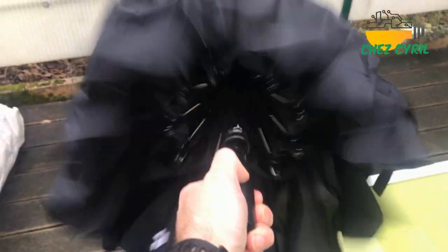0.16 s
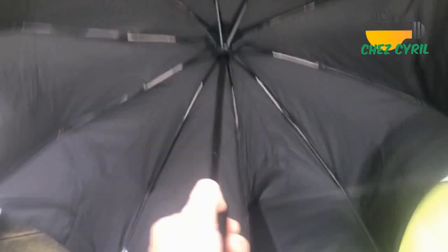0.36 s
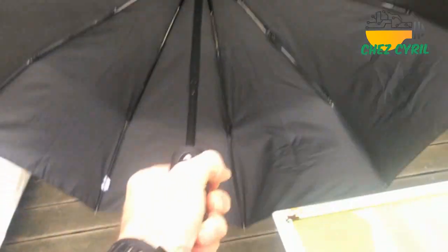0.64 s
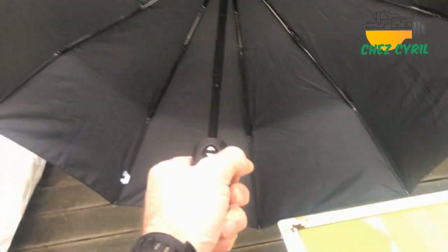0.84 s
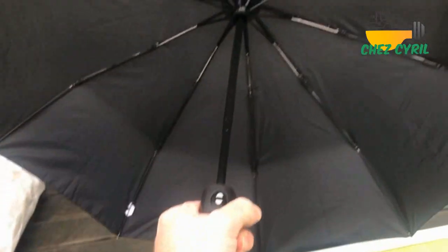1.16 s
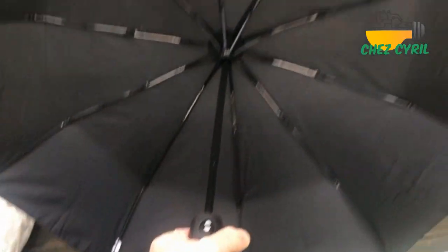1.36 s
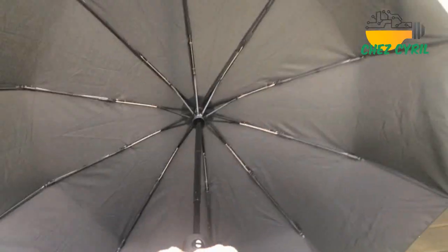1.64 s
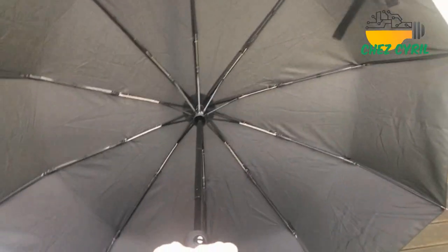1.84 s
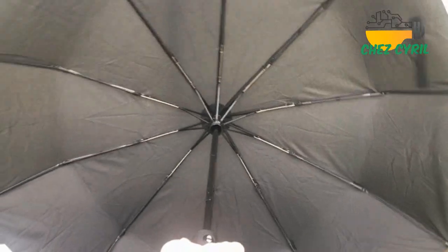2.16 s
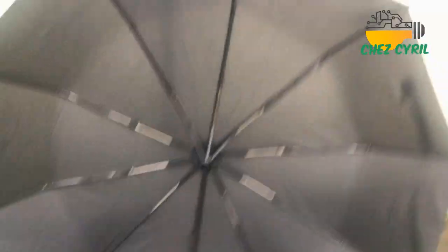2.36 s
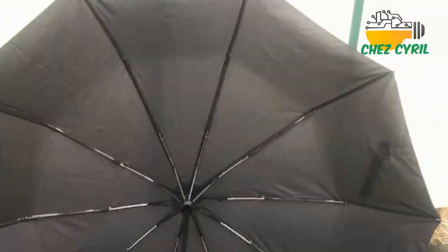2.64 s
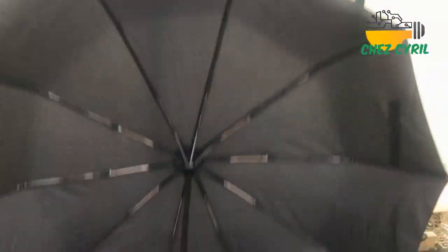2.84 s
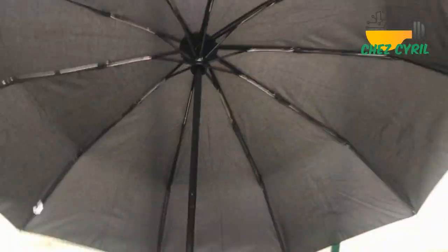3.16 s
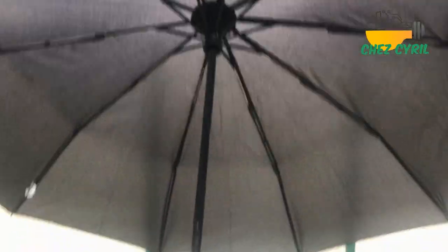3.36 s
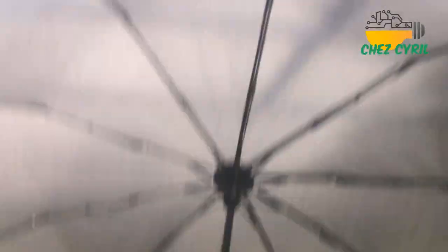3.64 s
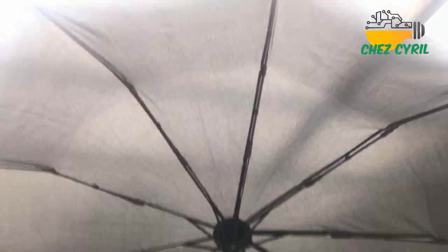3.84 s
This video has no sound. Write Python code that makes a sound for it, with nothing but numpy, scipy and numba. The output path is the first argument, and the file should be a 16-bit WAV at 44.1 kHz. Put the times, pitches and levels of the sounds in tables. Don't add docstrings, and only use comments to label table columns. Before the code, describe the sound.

A folding umbrella opens very close to a phone microphone in a windy yard. Low wind thumps start immediately; at 0.14 s a plastic latch snaps and the canopy bursts open in crackling fabric, with rib pings and shaft knocks until about 0.5 s. A small settling click comes near 0.7 s. Wind buffets continue, strong until 1.6 s, then sparser, over faint distant hush, with tiny cloth rubs and clicks after 3 s.

```python
import sys
import numpy as np
from scipy import signal
from scipy.fft import rfft, irfft
from scipy.io import wavfile
from scipy.ndimage import uniform_filter1d
from numba import njit

SR = 44100
rng = np.random.default_rng(int(sys.argv[2]) if len(sys.argv) > 2 else 0)


def boost_factor(decibels):
    exponent = np.asarray(decibels, float) / 20
    return 10 ** exponent


def wav_record(signal):
    frames = np.transpose(np.atleast_2d(signal))
    bounded = np.clip(frames, -1, 1)
    quanta = np.round(bounded * 32767).astype(np.int16)
    wavfile.write(sys.argv[1], SR, quanta)


N = 176400
TOP_HZ = 15800
CONTACT_RISE_S = 0.0004


@njit
def svf(x, hz, q, low):
    y, band, lowpass = np.empty(len(x)), 0., 0.
    for i in range(len(x)):
        g = np.tan(np.pi * hz[i] / SR)
        v = (band + g * (x[i] - lowpass)) / (1 + g * (g + 1 / q))
        y[i] = lowpass + g * v if low else v / q
        band, lowpass = 2 * v - band, lowpass + 2 * g * v
    return y


def unit(x):
    return x / np.sqrt(np.mean(x ** 2))


def smooth_twice(x, size):
    return uniform_filter1d(uniform_filter1d(x, size), size)


def walk(rate):
    hold = int(SR / rate)
    steps = np.repeat(rng.standard_normal(N // hold + 1), hold)
    return unit(smooth_twice(steps, hold)[:N])


def colour(x, table):
    hz, db = np.array(table).T
    log_f = np.log(np.fft.rfftfreq(N, 1 / SR) + 1)
    rumble_cut = 40 * (log_f < np.log(hz[0] / 2))
    return irfft(rfft(x) * boost_factor(np.interp(log_f, np.log(hz), db) - rumble_cut), N)


def grains(rate, spread_db):
    chance, sign, size = rng.random((3, N))
    return unit((chance < rate / SR) * np.sign(sign - .5) * boost_factor(-spread_db * np.log(size + .02)))


def bumps(table, edge):
    t = np.arange(N) / SR
    swell = np.array([boost_factor(db) * np.exp(-np.abs((t - s) / half_s) ** edge) for s, half_s, db, _ in table])
    swell = swell + 1e-9
    total = swell.sum(axis=0)
    return total, np.array(table)[:, 3] @ swell / total


# f/Hz, level/dB per Hz
TOWN_TONE = [(150, -9.5), (250, 0.5), (500, -3), (1200, -4.5), (1700, -10), (2500, -15.5), (7000, -26),
             (15500, -37.5)]


def hush():
    level_db, fade_db_per_s, flicker_db = -59, -0.69, 0.8
    x = colour(rng.standard_normal(N), TOWN_TONE)
    low = svf(x, np.full(N, 1800.), 1.0, True)
    high = x - low
    x = low * boost_factor(flicker_db * walk(7.2)) + high * boost_factor(flicker_db * walk(18.0))
    return unit(x) * boost_factor(level_db + fade_db_per_s * (np.arange(N) / SR - 3.5))


# centre t/s, half length/s,
# level/dB, eddy corner f/Hz
WIND_GUSTS = [(.08, 0.043, -27, 168), (.16, 0.023, -22, 126), (.27, 0.11, -36, 200), (.4, 0.039, -31, 277),
              (.44, 0.036, -28.5, 216), (.489, 0.016, -17, 157), (.655, 0.034, -25.5, 146),
              (.75, 0.042, -28, 163), (.87, 0.025, -23, 214), (.95, 0.044, -24, 200),
              (1.05, 0.028, -22.5, 254), (1.15, 0.061, -21.5, 243), (1.28, 0.053, -25.5, 226),
              (1.455, 0.03, -19, 268), (1.6, 0.024, -39.5, 184), (1.72, 0.023, -27, 131),
              (1.86, 0.018, -27.5, 157), (1.94, 0.02, -31.5, 174), (2.16, 0.042, -26, 253),
              (2.25, 0.0088, -33, 222), (2.34, 0.012, -22.5, 108), (2.39, 0.039, -23.5, 186),
              (2.55, 0.07, -35.5, 142), (2.65, 0.066, -48.5, 152), (2.98, 0.047, -34, 95),
              (3.078, 0.011, -25, 150), (3.35, 0.022, -21, 120), (3.425, 0.017, -26.5, 145),
              (3.56, 0.055, -26, 125), (3.715, 0.015, -24.5, 157), (3.99, 0.027, -36, 87.5),
              (1.198, 1.47, -42.5, 131.4), (3.303, 3.2, -48.5, 91), (2.8, 0.0082, -57, 100),
              (2.887, 0.0092, -38, 111), (3.128, 0.011, -27, 130), (3.29, 0.012, -30, 166),
              (3.489, 0.014, -32, 183), (0.54, 0.11, -41, 111), (1.37, 0.019, -32, 141),
              (3.759, 0.0097, -35, 110), (3.866, 0.036, -48.5, 108)]
# t/s, peak level/dB, f/Hz
WIND_BUFFETS = [(.031, -42, 300), (.083, -32.5, 206), (0.224, -35, 263), (.283, -36, 198),
                (.395, -24.5, 240), (0.403, -34, 200), (.428, -31, 393), (.479, -28, 173),
                (0.633, -36, 255), (.706, -48, 510), (.862, -29, 270), (.881, -39, 450), (.93, -41.5, 550),
                (0.958, -40, 397), (1.018, -31, 245), (1.038, -29, 250), (1.058, -41.5, 516),
                (1.12, -31, 336), (1.135, -39.5, 500), (1.158, -41.5, 600), (1.185, -44, 450),
                (1.24, -34, 434), (1.268, -47, 295), (1.291, -42.5, 550), (1.343, -40.5, 350),
                (1.425, -27.5, 348), (1.447, -32, 586), (1.461, -30, 450), (1.479, -27, 294),
                (1.549, -45, 254), (1.58, -41, 252), (1.606, -46, 220), (1.718, -48, 250),
                (1.762, -35.5, 204), (1.858, -38.5, 244), (1.94, -42.5, 296), (1.997, -44, 190),
                (2.142, -35.5, 370), (2.164, -35, 490), (2.246, -44, 267), (2.361, -39, 374),
                (2.4, -33.5, 380), (2.497, -45.5, 250), (2.533, -41, 246), (2.586, -50, 244),
                (2.7, -51, 250), (3.274, -52.5, 248), (3.41, -37.5, 450), (3.474, -46, 294),
                (3.525, -29.5, 213), (3.567, -41, 263), (3.606, -41, 223), (3.705, -41.5, 390),
                (3.71, -26, 166), (3.744, -51, 180)]


def wind():
    eddies_per_s, eddy_spread_db, gust_edge = 260, 3, 2.44
    buffet_db, buffet_cycles, buffet_delay_s = 7, 0.71, 0.002055
    mic_cut_hz, half = 39.3, 700
    size, hz = bumps(WIND_GUSTS, gust_edge)
    hz = 0.79 * hz * boost_factor(.5 * walk(30.38))
    x = grains(eddies_per_s, eddy_spread_db) + 0.21 * rng.standard_normal(N)
    x = svf(x, hz, 1.05, True)
    x = svf(x, 2.46 * hz, 0.77, True)
    x = svf(x, 3.0 * hz, 0.68, True)
    x = size * x / np.sqrt(smooth_twice(x ** 2, 1000) + 1e-12)
    t = np.arange(-half, half) / SR
    for (s, db, pitch_hz), turn in zip(WIND_BUFFETS, rng.random(len(WIND_BUFFETS))):
        i = int((s + buffet_delay_s) * SR)
        cycles = t * pitch_hz
        pulse = np.exp(-(cycles / buffet_cycles) ** 2) * np.sin(2 * np.pi * (cycles + turn))
        x[i - half:i + half] += boost_factor(db + buffet_db) * pulse
    return signal.sosfilt(signal.butter(4, mic_cut_hz, "high", fs=SR, output="sos"), x)


def crackle(rate, spread_db, hiss):
    out = hiss * rng.standard_normal(N)
    for hz in 600 * 2 ** np.arange(0, 4.8, .5):
        ring = unit(svf(grains(rate * (hz / 3000) ** 1.1, spread_db), np.full(N, hz), 4., False))
        out += ring * np.sqrt(hz / 50000) * boost_factor(min(3, 9000 / hz) * walk(60))
    return out


# centre t/s, half length/s, level/dB, f/Hz
CLOTH_RUBS = [(.05, 0.18, -68, 10800), (.72, 0.022, -53.5, 6900), (.53, .08, -61, 9200),
              (.96, 0.011, -66.5, 6000), (1.16, 0.021, -70, 6000), (1.35, 0.02, -72, 6500),
              (1.1, 0.74, -73.5, 8000), (1.68, 0.02, -75.5, 6960), (1.845, 0.013, -66.5, 8000),
              (2.39, 0.011, -72.5, 6940), (2.538, .006, -67, 9000), (2.96, .014, -61, 2200),
              (3.11, .032, -65.5, 10000), (3.262, 0.041, -64, 8000), (3.335, 0.037, -66.5, 8900),
              (3.408, 0.025, -57.5, 9900), (3.345, .012, -67.5, 3500), (3.51, 0.02, -67, 4970),
              (3.78, 0.042, -76, 9000), (3.97, 0.017, -74, 9000)]


def rustles():
    size, hz = bumps(CLOTH_RUBS, 1.8)
    rub = unit(svf(crackle(400, 4.5, .6), hz, .45, False))
    return size * boost_factor(1.6 * walk(70)) * rub


# t/s, level/dB
CANOPY_EFFORT = [
    (0.123, -73),
    (0.137, -37.5),
    (.195, -36.5),
    (.215, -28),
    (.31, -33.5),
    (0.464, -31),
    (0.499, -50),
    (.69, -60),
    (.76, -61),
]
# f/Hz, level/dB per Hz
CANOPY_TONE = [(300, 3), (500, 0.5), (1100, 1), (1500, 0.5), (1900, -4.5), (3000, -1), (5000, -6),
               (15500, -7.5)]


def fabric():
    creases_per_s, crease_spread_db, flutter_db = 400, 4.6, 1.3
    s, db = np.array(CANOPY_EFFORT).T
    effort_db = np.interp(np.arange(N) / SR, s, db, left=-120, right=-120)
    effort_db = effort_db + flutter_db * walk(63.9)
    return boost_factor(effort_db) * unit(colour(crackle(creases_per_s, crease_spread_db, 1.0), CANOPY_TONE))


# f/Hz, level/dB, t60/s
LATCH_MODES = [
    (734, -12, 0.0064),
    (2240, -7, 0.0092),
    (2670, 0, 0.011),
    (3340, -2, 0.015),
    (4190, -9, 0.011),
    (5065, -4, 0.018),
    (6300, -8, 0.0062),
    (7050, -20, 0.009),
    (8740, -4.5, 0.013),
    (12400, -6.5, 0.0091),
]


def latch():
    snap_s, snap_db, rise_s = 0.1374, -16, 0.000067
    out, t = np.zeros(N), np.arange(2000) / SR
    ring = np.zeros(len(t))
    for hz, db, t60 in LATCH_MODES:
        ring += boost_factor(db - 60 * t / t60) * np.sin(2 * np.pi * (hz * t + rng.random()))
    ring = ring * (1 - np.exp(-t / rise_s))
    ring = ring + boost_factor(-7 - 60 * t / 0.0066) * rng.standard_normal(len(t))
    for late_s, db in [(0, -6), (.0011, 7), (.0024, -4.5)]:
        i = int((snap_s + late_s) * SR)
        out[i:i + len(t)] += boost_factor(snap_db + db) * ring / 2
    return out


# t/s, level/dB, f/Hz, t60/s
RIB_PINGS = [(0.1655, -24, 1214, 0.021), (.167, -25, 4370, 0.022), (.174, -25.5, 6670, 0.022),
             (0.21, -27, 1870, .012), (.237, -25, 4230, .015), (0.29, -24.5, 1480, 0.034),
             (0.314, -21.5, 1493, .035), (0.3314, -21.5, 1220, 0.032), (0.334, -27, 3770, 0.013),
             (.356, -39, 3100, .02), (0.394, -32, 5540, 0.013), (0.415, -28.5, 6000, 0.015),
             (0.463, -24, 900, 0.014), (0.7105, -37, 6300, 0.0091), (.7135, -28, 2130, .006),
             (.2283, -19.5, 790, 0.01), (.7095, -30, 920, 0.0091), (.4285, -26.5, 690, .02),
             (3.2201, -54, 9000, 0.0044), (3.4335, -49, 13600, .006), (3.487, -59, 5000, .005),
             (3.517, -56, 5500, 0.007)]


def pings():
    partner_ratio, partner_db, rattle_depth = 1.9, -10, 0.6
    tick_db, tick_t60_s = -4.5, 0.0045
    out, t = np.zeros(N), np.arange(3000) / SR
    noise = rng.standard_normal((len(RIB_PINGS), len(t)))
    for (s, db, hz, t60), x in zip(RIB_PINGS, noise):
        ring = np.sin(2 * np.pi * hz * t)
        partner_hz = hz * partner_ratio
        if partner_hz < TOP_HZ:
            ring = ring + boost_factor(partner_db) * np.sin(2 * np.pi * partner_hz * t + x[0])
        rattle = 1 + rattle_depth * unit(uniform_filter1d(x[::-1], size=70))
        ring = ring * rattle * boost_factor(-60 * t / t60) * (1 - np.exp(-t / CONTACT_RISE_S))
        tick = x * boost_factor(tick_db - 60 * t / tick_t60_s)
        i = int(s * SR)
        out[i:i + len(t)] += boost_factor(db) * (ring + tick)
    return out


# t/s, level/dB, f/Hz, t60/s
RUNNER_KNOCKS = [(0.1666, -25, 12000, 0.03), (.1658, -26, 2500, 0.044), (.2115, -20, 2000, 0.011),
                 (.2275, -19, 1000, 0.011), (0.2355, -22.5, 3520, 0.019), (.295, -20.5, 3180, 0.0098),
                 (.311, -26, 1400, 0.023), (.326, -23.5, 1300, 0.016), (.3309, -19, 2350, 0.012),
                 (.3311, -23, 14500, 0.028), (0.366, -19, 2680, 0.0062), (.393, -29.5, 4000, 0.021),
                 (0.415, -31.5, 7140, 0.052), (.427, -22.5, 950, 0.091), (.4315, -23, 3500, 0.016),
                 (0.4684, -25.5, 10600, 0.023), (0.566, -37.5, 1950, 0.012), (.658, -51, 1480, 0.053),
                 (.692, -42, 10500, 0.012), (0.7074, -39, 5330, 0.027), (.7128, -36, 3100, 0.036),
                 (3.0778, -47, 2190, 0.013), (3.121, -47, 8900, 0.013), (3.165, -49, 1700, 0.013),
                 (3.266, -53, 9000, 0.013), (3.343, -56, 4500, 0.026), (3.392, -60, 11000, 0.012),
                 (3.498, -50, 3500, 0.017), (3.957, -57, 7000, 0.012), (3.973, -53, 6000, .012)]


def knocks():
    width, top_ratio = 1.3, 2.9
    out, t = np.zeros(N + 3000), np.arange(3000) / SR
    noise = rng.standard_normal((len(RUNNER_KNOCKS), len(t)))
    for (s, db, hz, t60), x in zip(RUNNER_KNOCKS, noise):
        x = svf(x, np.full(len(t), 1. * hz), 1. / width, False)
        x = unit(svf(x, np.full(len(t), min(top_ratio * hz, TOP_HZ)), 0.58, True))
        i = int(s * SR)
        out[i:i + len(t)] += x * boost_factor(db - 60 * t / t60) * (1 - np.exp(-t / CONTACT_RISE_S))
    return out[:N]


def yard_echo(near):
    echo_db, echo_t60_s, first_return_s = -22, 0.3, 0.004
    t = np.arange(SR // 2) / SR
    yard = rng.standard_normal(len(t)) * boost_factor(-60 * t / echo_t60_s) * (t > first_return_s)
    wet = signal.fftconvolve(near, yard / np.sqrt(np.sum(yard ** 2)))[:N]
    return boost_factor(echo_db) * wet


def scene():
    near = rustles() + fabric() + latch() + knocks()
    return (hush() + wind() + near + yard_echo(near) + pings())[None]


def band_limit(x):
    return signal.sosfilt(signal.butter(12, 16820, fs=SR, output="sos"), x)


def record(dry):
    top_cut = signal.ellip(10, .2, 80, TOP_HZ, fs=SR, output="sos")
    mix = signal.sosfilt(top_cut, dry)
    return band_limit(mix)


dry = scene()
out = record(dry)
wav_record(out)
```